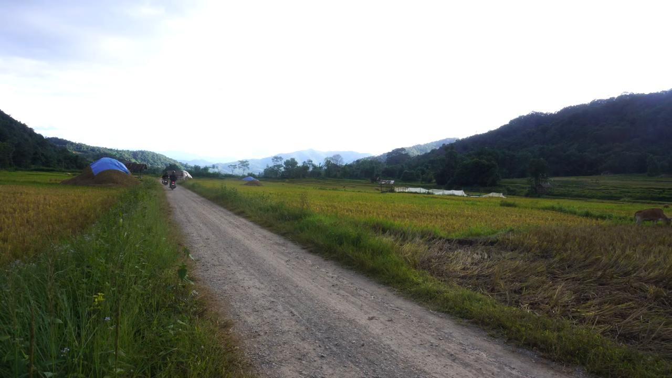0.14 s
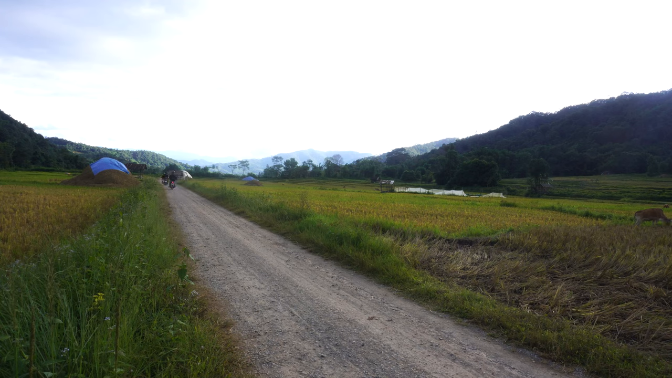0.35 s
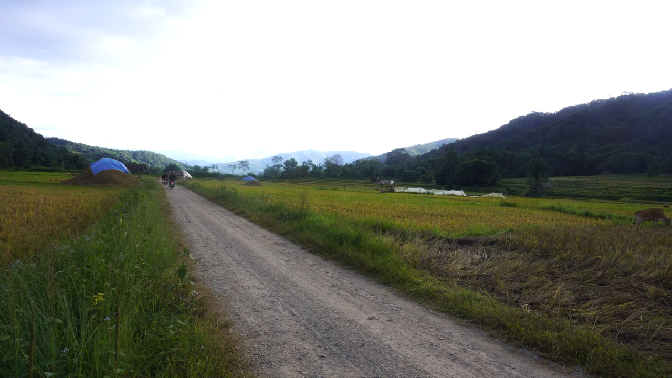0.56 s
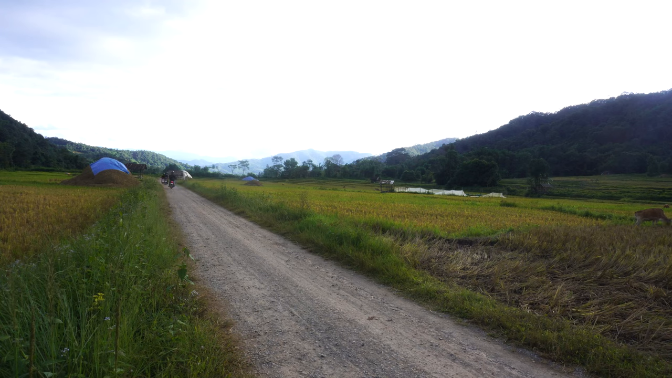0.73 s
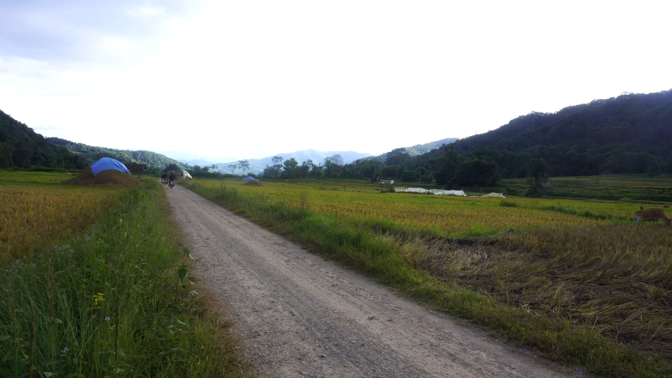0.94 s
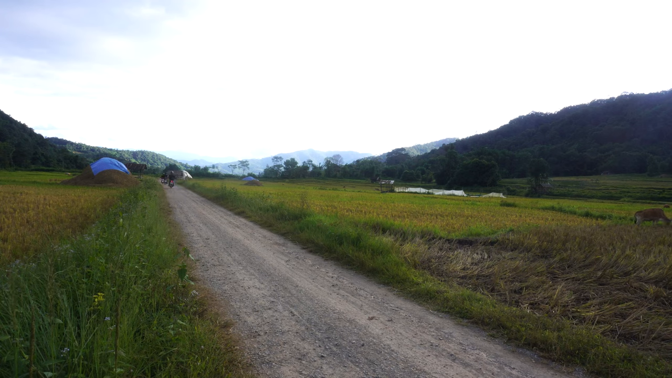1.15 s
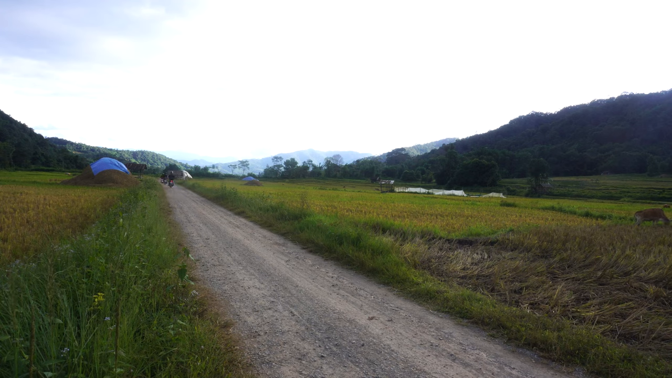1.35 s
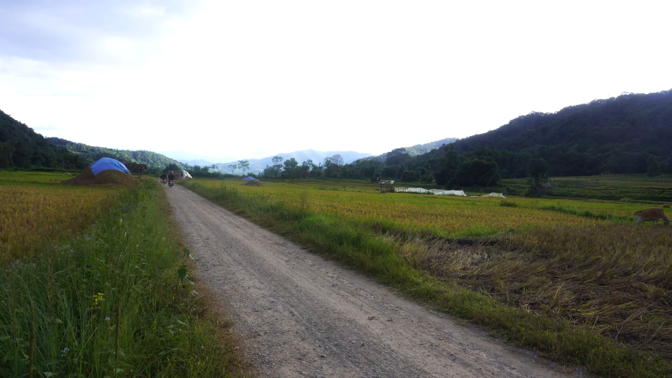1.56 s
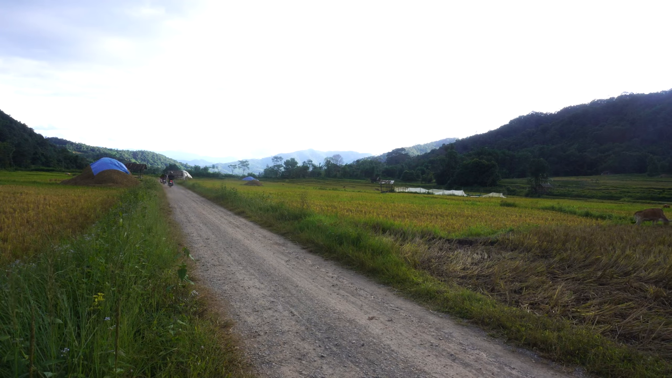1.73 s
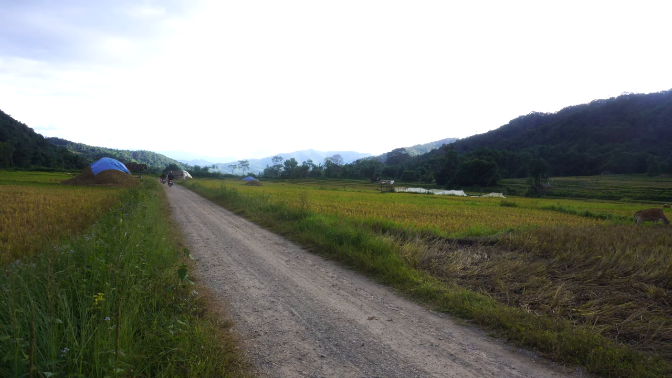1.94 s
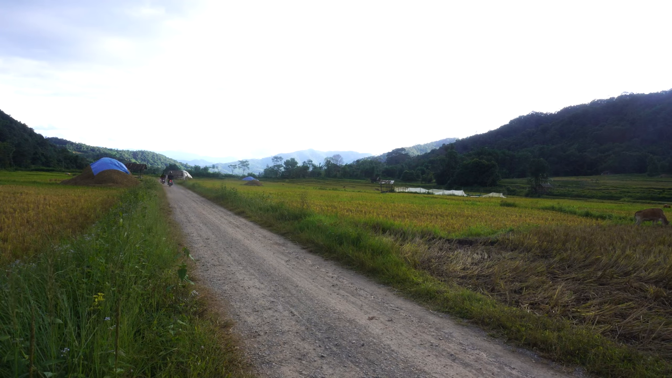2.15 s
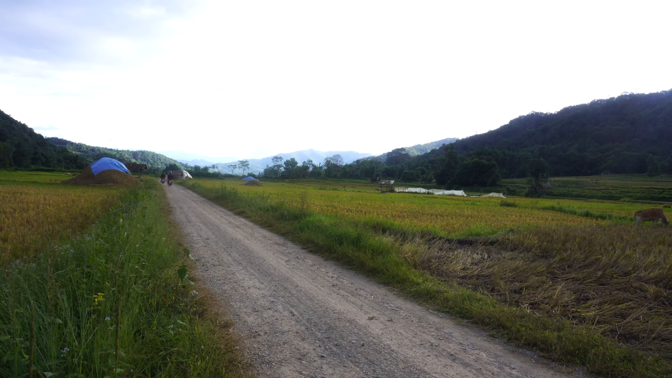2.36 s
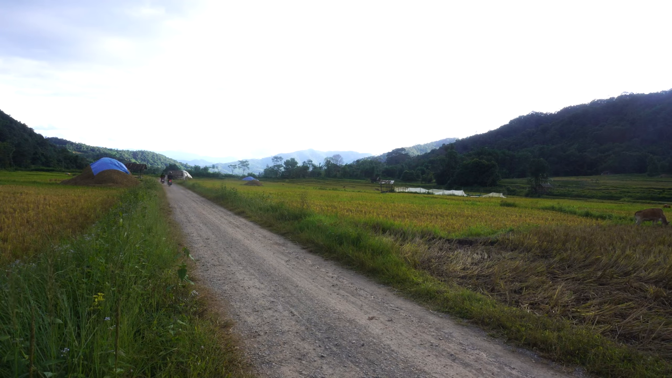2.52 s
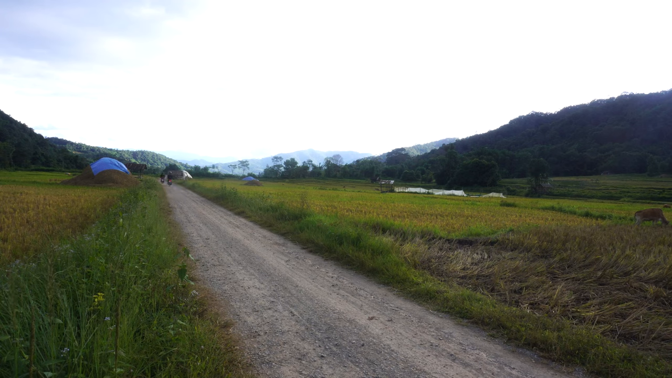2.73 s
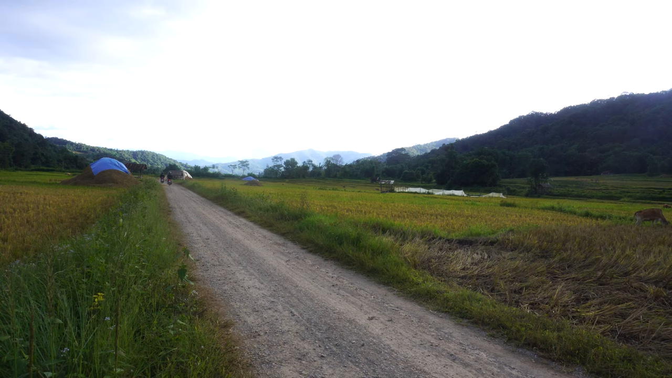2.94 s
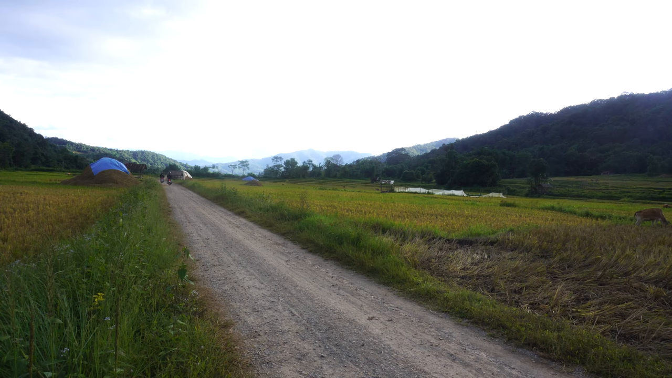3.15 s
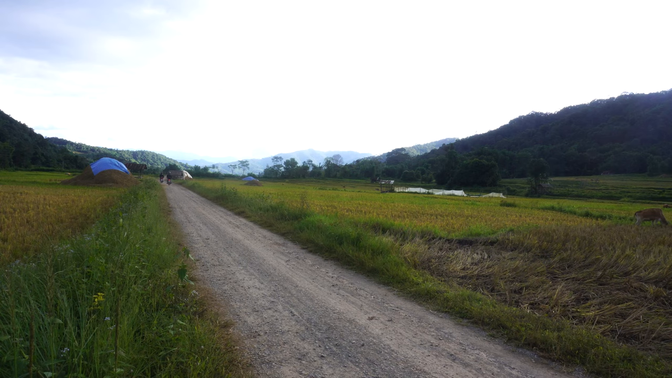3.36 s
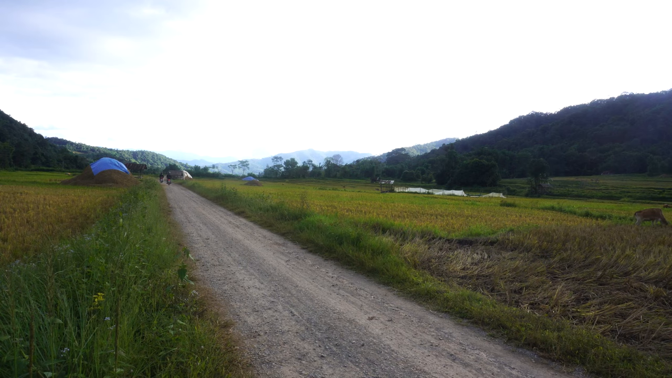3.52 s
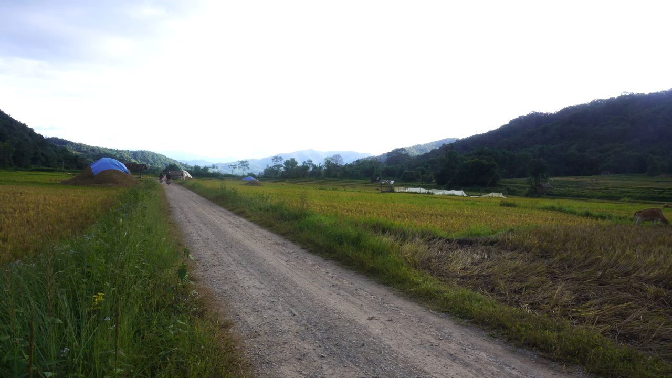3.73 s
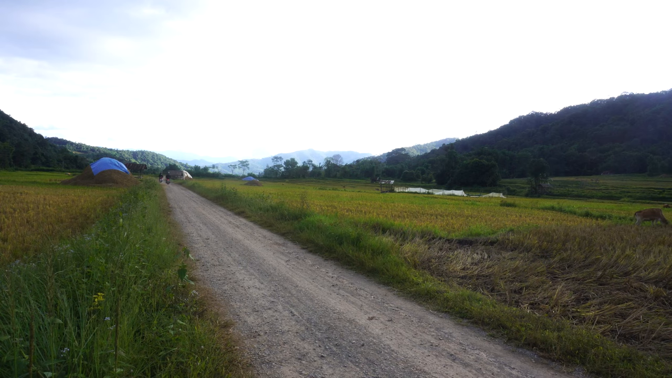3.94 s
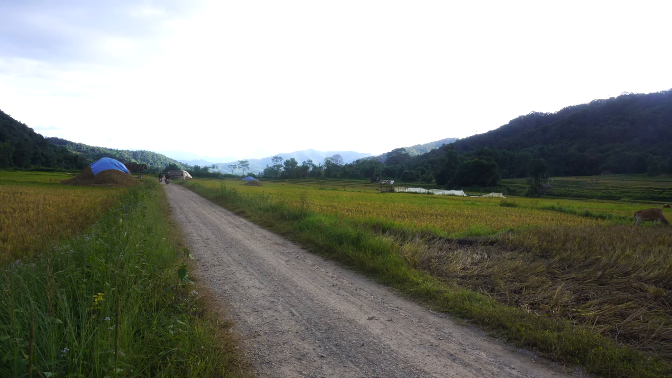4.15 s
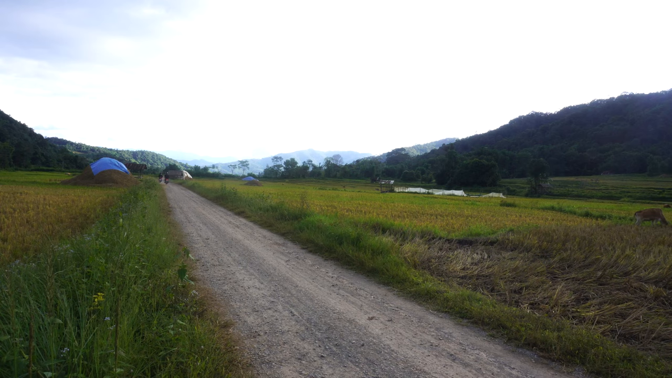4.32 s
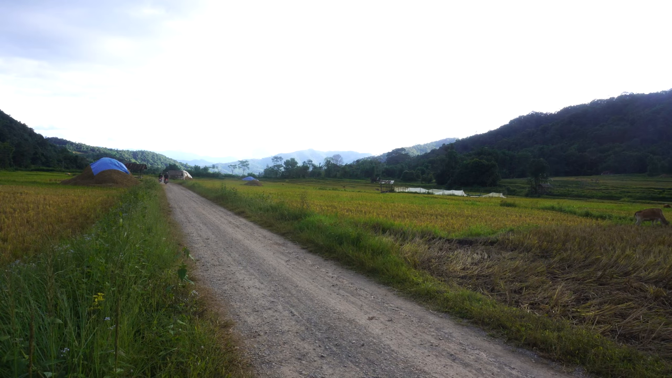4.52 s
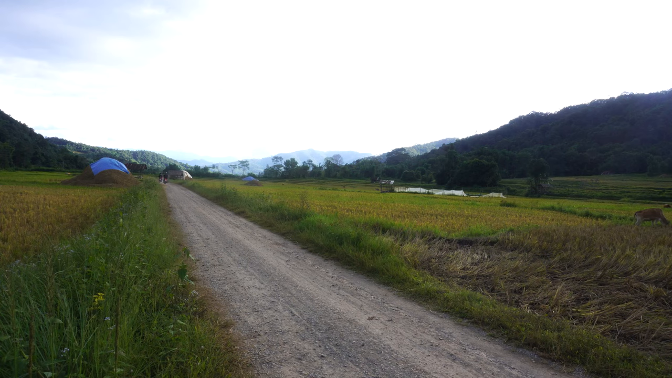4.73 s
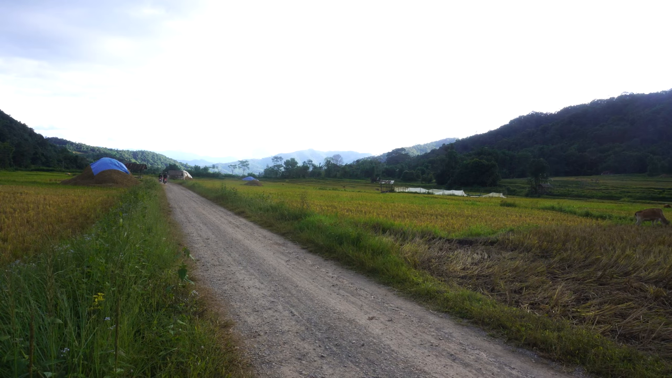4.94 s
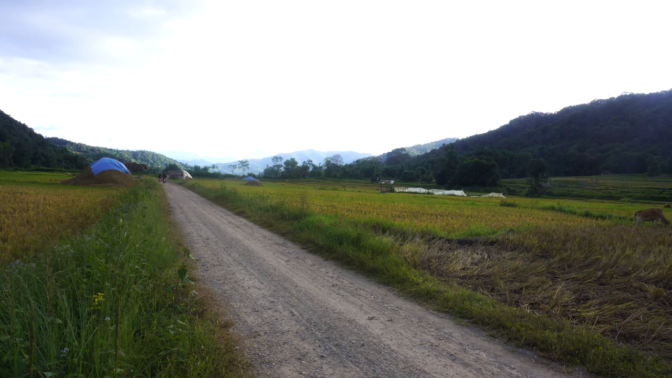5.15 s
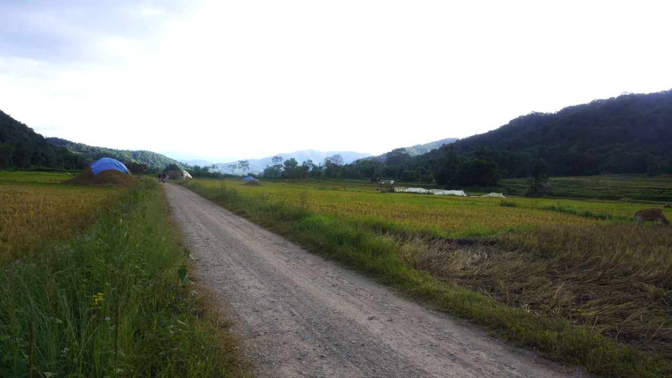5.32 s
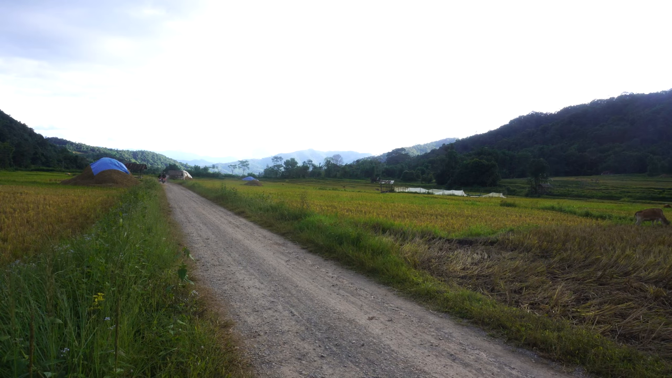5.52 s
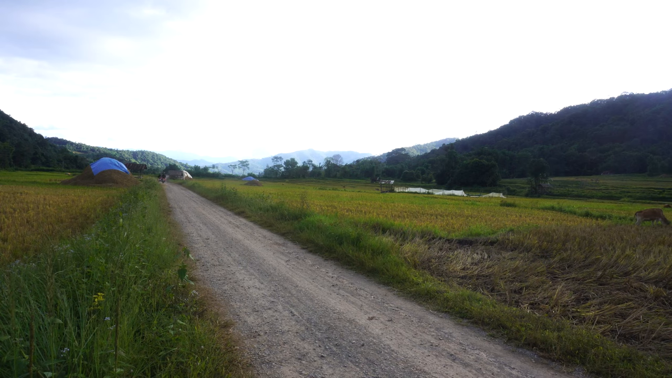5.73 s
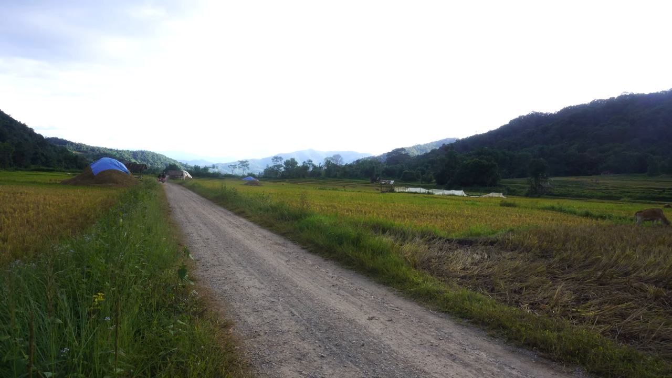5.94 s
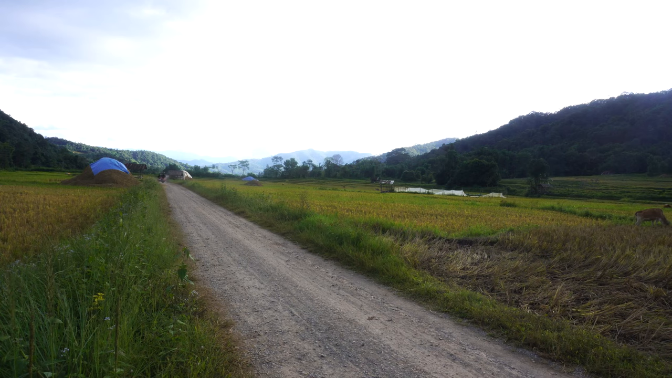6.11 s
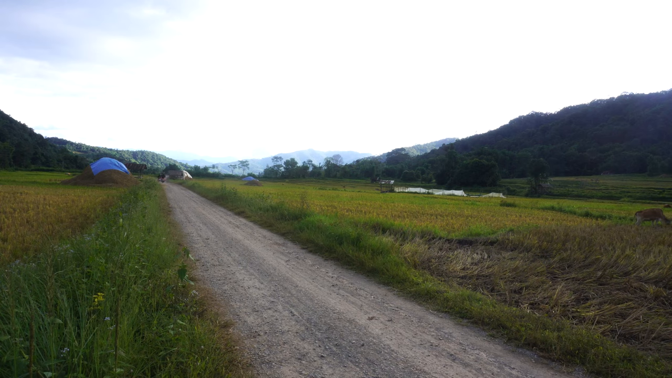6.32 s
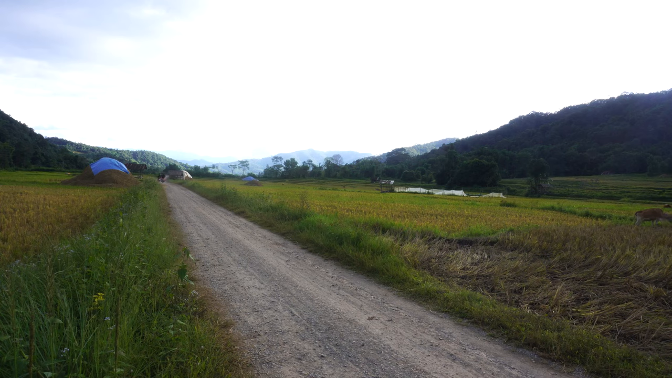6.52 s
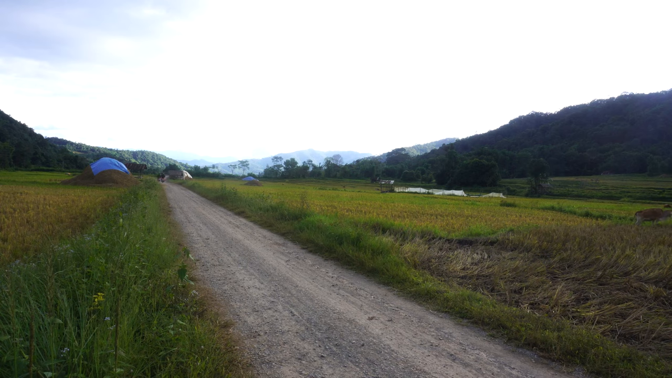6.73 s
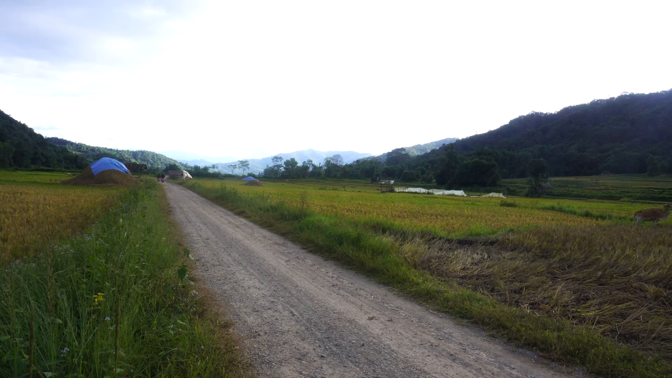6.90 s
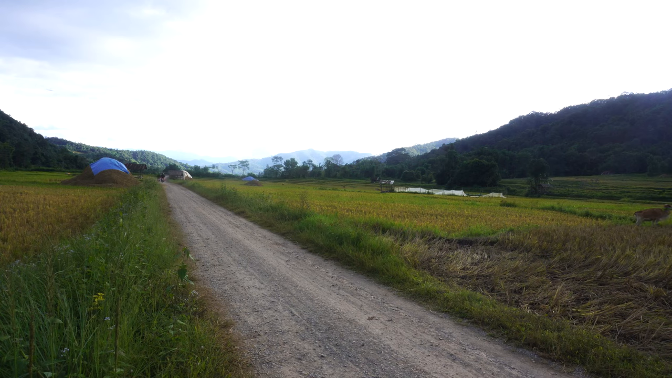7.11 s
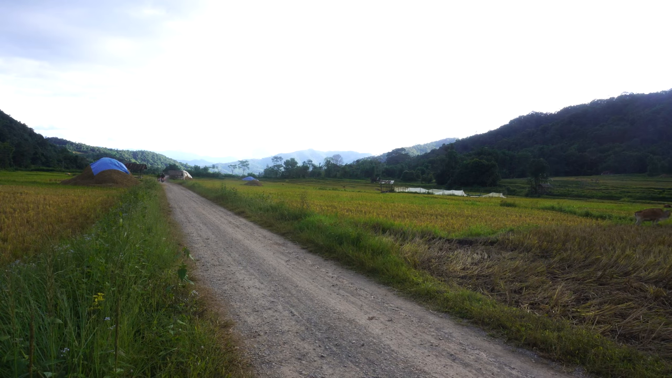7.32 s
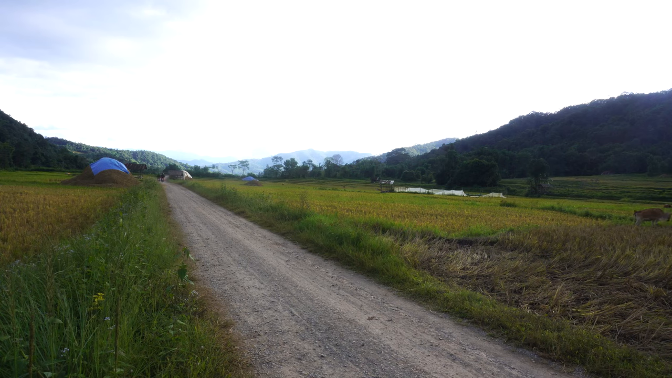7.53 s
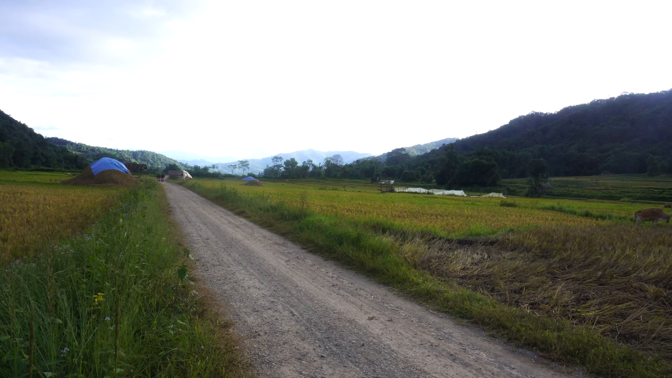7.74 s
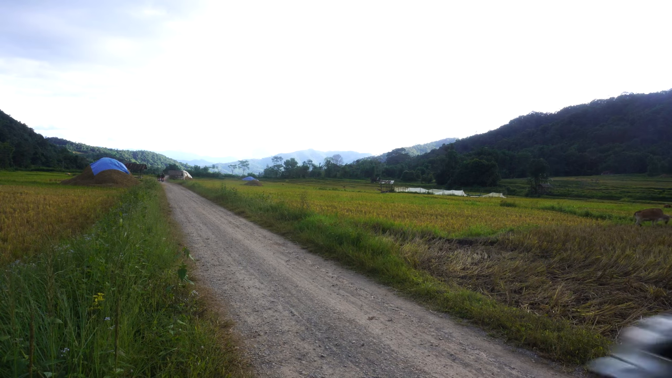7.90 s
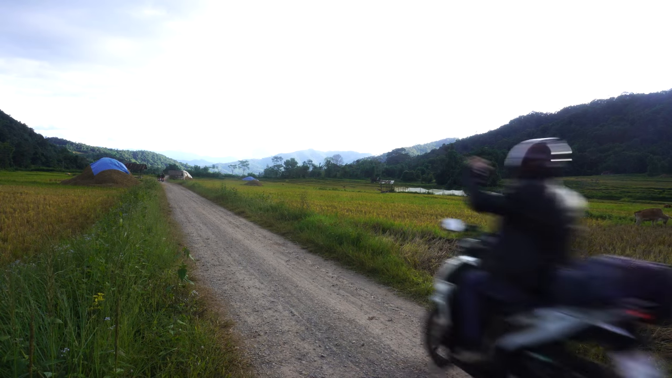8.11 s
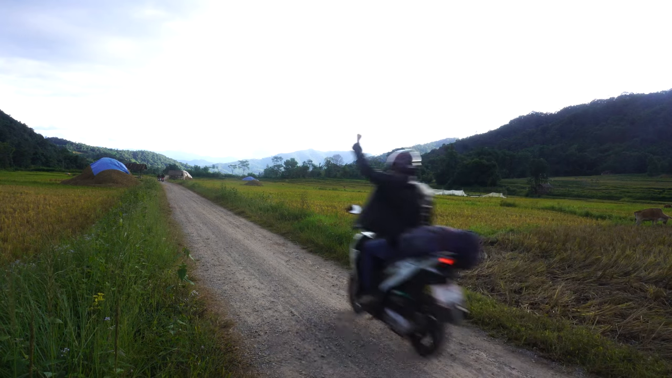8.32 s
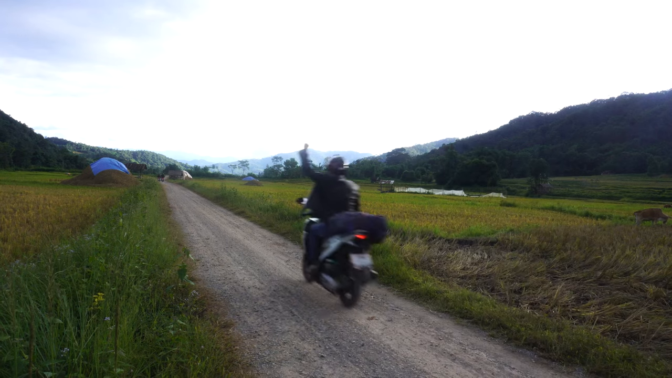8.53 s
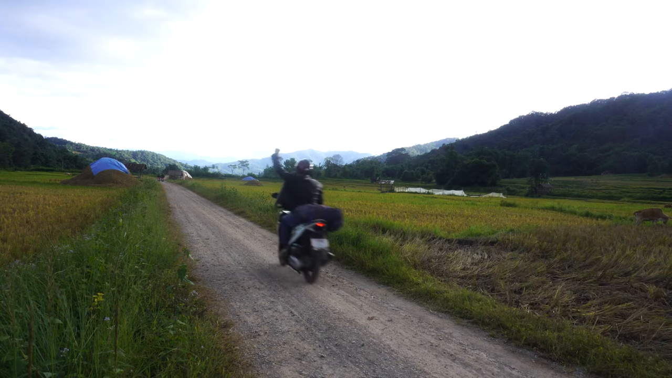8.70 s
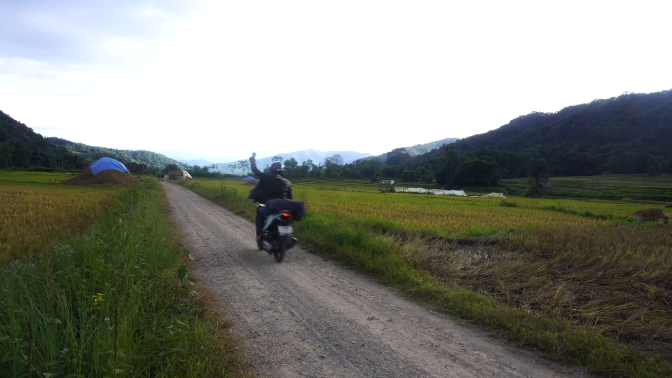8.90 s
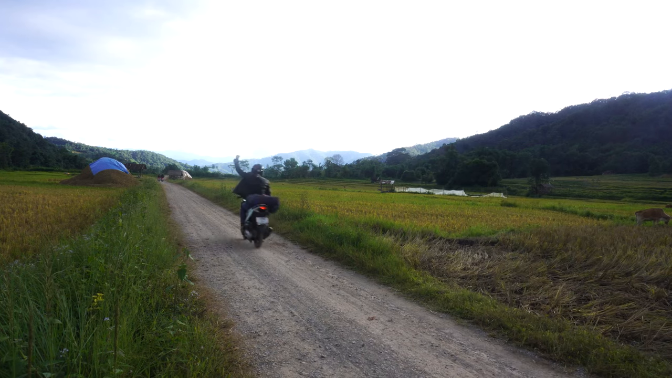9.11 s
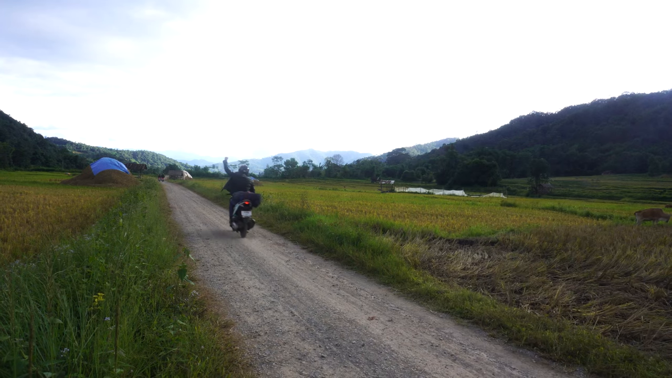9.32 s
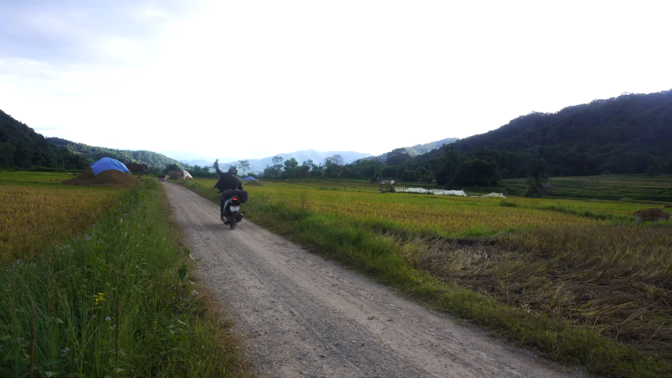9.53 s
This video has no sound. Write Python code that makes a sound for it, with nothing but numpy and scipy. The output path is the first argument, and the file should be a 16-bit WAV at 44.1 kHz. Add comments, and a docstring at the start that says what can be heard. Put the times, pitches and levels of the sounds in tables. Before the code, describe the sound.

In quiet open fields, two far scooters putter over a soft rush, with thin crickets and katydids. Something hollow knocks once, and a small bird gives short high chips. A third scooter comes up the gravel track from behind, flicking stones, and passes close to the microphone with a puffing exhaust, whining gears and hissing tyres. Its pitch drops as it drives away.

```python
"""Two far scooters putter over the soft rush of rice fields; crickets and katydids rub their wings,
a small bird chips and something hollow knocks once. A third small scooter comes up the gravel track
from behind, flicking stones, passes close by and drives away. Its firings puff from the exhaust and
ring the casing, its gears whine, its tyres and fan hiss. One microphone, the same in both channels."""
import sys
import numpy as np
from scipy import signal
from scipy.fft import rfft, irfft, next_fast_len
from scipy.io import wavfile
from scipy.ndimage import uniform_filter1d

SR = 44100
rng = np.random.default_rng(int(sys.argv[2]) if len(sys.argv) > 2 else 0)


def pcm_store(signal):
    """Save signal as 16-bit PCM."""
    levels = np.round(np.clip(np.atleast_2d(signal), -1, 1) * 32767)
    wavfile.write(sys.argv[1], SR, levels.astype(np.int16).T)


N = 426006
TIME = np.arange(N) / SR
SOUND_M_S = 343

# Engine speed: time_s, firings_per_s
ENGINE_SPEED = [(3.3, 28.5), (4, 30.05), (5, 30.65), (5.8, 31.7), (7.24, 32.9), (8.1, 32.58), (8.6, 32.65),
                (9.66, 33.3)]
# Layer faders at 1 m, by angle from the nose: angle_deg, exhaust_db, casing_db, clatter_db, hiss_db
DIRECTIVITY = [(0, -30.5, -31.5, -33, -36), (57.8, -33.5, -30.5, -32, -29), (96, -22, -26, -21.5, -32.5),
               (130.6, -17.5, -24, -14.5, -20), (148.5, -10.5, -25, -13.5, -10),
               (156, -9, -24.5, -15.5, -11), (172.2, -6.5, -12.5, -12, -11)]
# Loss along the grass verge, for the same four layers: loss_db_per_m
VERGE_LOSS = [0.01, 0.19, 0.011, 0.38]
CLOSEST_S, CLOSEST_M, SPEED_M_S = 7.88, 1.68, 6.23
ENGINE_HEIGHT_M, MIC_HEIGHT_M, GROUND_ECHO, GRAZING_M = 0.2946, 1.09, 0.36, 24
def passing_scooter():
    """The pass-by: Doppler bends the pitch while the mix turns from nose to side to tail."""
    along = SPEED_M_S * (TIME - CLOSEST_S)
    distance = np.hypot(along, CLOSEST_M)
    heard_hz = in_time(ENGINE_SPEED)[0] / (1 + SPEED_M_S * along / distance / SOUND_M_S)
    turns = np.cumsum(heard_hz * (1 + .0015 * drift(8))) / SR  # one turn per firing
    angle = np.degrees(np.arctan2(CLOSEST_M, -along))
    tail_on = ((1 + along / distance) / 2) ** 2.9  # 0 nose towards us, 1 tail towards us
    angles, *faders = np.transpose(DIRECTIVITY)
    exhaust_gain, casing_gain, clatter_gain, hiss_gain = [
        from_db(np.interp(angle, angles, db) - loss * distance) / distance
        for db, loss in zip(faders, VERGE_LOSS)]
    puffs = exhaust_gain * exhaust(turns, tail_on, distance)
    # the mechanics throb with each firing and each crank turn
    throb = 1 + 0.022 * np.cos(2 * np.pi * turns) + 0.049 * np.cos(4 * np.pi * turns)
    body = casing_gain * casing(turns, throb, along)
    body += clatter_gain * clatter(throb)
    body += hiss_gain * round_housing(tyres_and_fan(turns), along / distance, tail_on)
    # the bounce off the track lags less from far away, and mirrors fully from GRAZING_M on
    bounce_m = np.hypot(distance, MIC_HEIGHT_M + ENGINE_HEIGHT_M)
    direct_m = np.hypot(distance, MIC_HEIGHT_M - ENGINE_HEIGHT_M)
    echo_gain = GROUND_ECHO * np.minimum(distance / GRAZING_M, 1)
    return puffs + body + echo_gain * delayed(body, bounce_m - direct_m)


# Exhaust tone from ahead and from behind: harmonic, level_db
EXHAUST_FRONT = [(1, -4.5), (2, 2.5), (3, -7), (4, -6.5), (5, -12), (6, -14), (7, -10), (8, -1.5), (9, -2),
                 (10, -3), (11, -16), (12, -7.5), (13, -9.5), (14, -10), (15, -5.5), (16, -21), (17, -8),
                 (18, -9), (19, -11), (20, -3)]
EXHAUST_REAR = [(1, -13), (2, -10), (3, -21.5), (4, -1.5), (5, -7.5), (6, -16), (7, -18), (8, -16),
                (9, -11), (10, -14), (11, -6), (12, -16), (13, -7), (14, -14.5), (15, -9), (16, -17.5),
                (17, -14), (18, -27), (19, -16), (20, -58)]
def exhaust(turns, tail_on, distance):
    """The pipe's note crossfades from front to rear; soft ground dulls it with distance."""
    levels_db = [front + tail_on * (rear - front) - 0.018 * k * distance
                 for (k, front), (_, rear) in zip(EXHAUST_FRONT, EXHAUST_REAR)]
    return engine_note(turns, levels_db, waver_db=1.2, smear_rad=1.2)


# Ring of the casing and drive cover: pitch_hz, width_hz, front_db, side_db, rear_db
CASING_MODES = [(895, 73, 0, -1.5, -1), (972, 50, -1.5, -13, -19), (1680, 71, -15, 8, -21),
                (1780, 79, -26, -11, -1.5), (1874, 49, -43, 4.5, -30), (3070, 560, -7, 9, -13),
                (3650, 67, -16, -2, -28), (4060, 420, -6, -15, -50), (4660, 91, -24, -17, -17),
                (4880, 100, -14.5, -18, -14)]
# Whine of gear and fan teeth: firing_multiple, front_db, side_db, rear_db
GEAR_WHINES = [(22, -18, 0, -3.5), (38.97, -16, 5, -1.5), (42, -30, 7.5, -18), (53, -29, -20, 1.5),
               (120.4, -16, 7, -13)]
def casing(turns, throb, along):
    """Firings and throbbing noise ring the casing; teeth whine in step with the engine."""
    firings = np.diff(np.floor(turns), prepend=0) * from_db(2.7 * rng.standard_normal(N))
    shake = rms_one(resonate(firings, 770, 1940)) + 3.46 * throb * rng.standard_normal(N)
    aspects_m = [-2.1, 3.5, 8.5]  # places on the track where it shows front, side and rear
    out = 0
    for multiple, *aspect_db in GEAR_WHINES:
        gain = from_db(np.interp(along, aspects_m, aspect_db) + 3.0 * drift(5.7))
        out += gain * np.sin(2 * np.pi * multiple * (turns + 0.0037 * drift(7)))
    for hz, width_hz, *aspect_db in CASING_MODES:
        out += from_db(np.interp(along, aspects_m, aspect_db)) * rms_one(resonate(shake, hz, width_hz))
    return out


# Clatter EQ: frequency_hz, gain_db
CLATTER_EQ = [(30, -26), (70, -16), (150, -4), (300, -2), (700, -3), (1200, -2.5), (2000, -5.5),
              (3000, -18), (6000, -68)]
def clatter(throb):
    """Dense midrange engine clicks that pulse with the firings."""
    return throb * coloured(grit(per_s=1200, spread_db=2.5, noise=2.7), CLATTER_EQ)


# Hiss EQ: frequency_hz, gain_db
HISS_EQ = [(700, -10), (1800, -14.5), (2600, 3), (3900, -1.5), (5400, -5.5), (6300, -13), (9800, -16),
           (12500, -23.5), (15800, -33)]
def tyres_and_fan(turns):
    """Bright hiss of gravel and fan, fluttering with the crank."""
    flutter = 1 + 0.073 * np.cos(4 * np.pi * turns)
    hiss = coloured(grit(per_s=2000, spread_db=1.2, noise=1.0), HISS_EQ)
    return flutter * hiss * from_db(0.2 * drift(36))


HOUSING_M, HOUSING_SWING, HOUSING_ECHO = .107, .3, .45
def round_housing(hiss, bearing_cos, tail_on):
    """Hiss from behind also bends round the microphone, inverted; the detour shrinks from the side."""
    detour_m = HOUSING_M * (1 - HOUSING_SWING * (1 - np.abs(bearing_cos)))
    return hiss - HOUSING_ECHO * (1 - .7 * tail_on) * delayed(hiss, detour_m)


# Stone hits: start_s, level_db
STONE_HITS = [(1.6484, -36), (3.051, -31), (3.3144, -47), (6.1836, -29), (7.279, -29), (7.5494, -20),
              (7.6584, -24), (8.1854, -8)]
SNAP_HZ, SNAP_WIDTH_HZ, SNAP_DECAY_S = 3960, 3800, 0.0014
def flicked_stones():
    """Each stone flicked by a tyre is a tiny noise burst with a broad ring."""
    out, t = np.zeros(N), np.arange(300) / SR
    for start_s, level_db in STONE_HITS:
        burst = rng.standard_normal(len(t)) * np.exp(-t / SNAP_DECAY_S)
        snap = resonate(resonate(burst, SNAP_HZ, SNAP_WIDTH_HZ), SNAP_HZ, SNAP_WIDTH_HZ)
        at = int(start_s * SR)
        out[at:at + len(t)] += from_db(level_db - 1.5) * snap / np.abs(snap).max()
    return out


# Engine speeds of the two far scooters: time_s, firings_per_s
STEADY_SPEED = [(0, 18.8), (4, 19.5)]
REVVING_SPEED = [(0, 20.85), (2.1, 20.1), (2.25, 23.2)]
# The steady one comes out from cover: time_s, level_db
STEADY_FADER = [(.7, -65), (1.4, -52)]
# Throttle blips on the revving one: start_s, boost_db
BLIPS = [(2.2, 7), (4.8, 16)]
# Tone of both exhaust pipes: frequency_hz, gain_db
PIPE_EQ = [(18, -22), (40, -6), (60, -7), (100, 0.5), (128, 0.5), (150, -5), (175, -27), (260, -11.5)]
REVVING_DB, FADE_DB_PER_S = -44, 3.5
BLIP_RISE_S, BLIP_FALL_S, BLIP_HZ = 0.145, 0.3025, 2.2
def far_scooters():
    """Two low chugs shaped by their pipes: one holds steady, one revs as it drives away."""
    revving_hz = in_time(REVVING_SPEED)[0]
    revving_db = REVVING_DB - FADE_DB_PER_S * TIME
    for start_s, boost_db in BLIPS:
        since = np.maximum(TIME - start_s, 0)
        release = np.exp(-np.maximum(since - BLIP_RISE_S, 0) / BLIP_FALL_S)
        throttle = np.minimum(since / BLIP_RISE_S, 1) * release
        revving_hz += BLIP_HZ * throttle
        revving_db += boost_db * throttle
    steady = in_time(STEADY_SPEED) + in_time(STEADY_FADER)
    pipe_hz, pipe_db = np.transpose(PIPE_EQ)
    out = 0
    for firing_hz, level_db in [steady, (revving_hz, revving_db)]:
        turns = np.cumsum(firing_hz * (1 + 0.0028 * drift(3.6))) / SR
        levels_db = [np.interp(k * firing_hz, pipe_hz, pipe_db) for k in range(1, 13)]
        out += from_db(level_db) * engine_note(turns, levels_db, waver_db=1.3, smear_rad=.5)
    return out


# Ring of the loose part: pitch_hz, width_hz, level_db
LOOSE_PART_MODES = [(1660, 550, 12), (2180, 110, 13.5), (3060, 460, 13)]
# Rattle fader: time_s, level_db
RATTLE_FADER = [(0, -68), (2.3, -52), (4.2, -50), (5, -59), (7, -57)]
TICK_PAIRS_PER_S = 46.9
def far_rattle():
    """A loose part on a far scooter ticks strong, weak, strong, weak."""
    count = np.floor(2 * TICK_PAIRS_PER_S * TIME + .25 * drift(3))
    accent_db = -8.0 * (count % 2) + 0.65 * rng.standard_normal(N)
    ticks = np.abs(np.diff(count, prepend=0)) * from_db(accent_db)
    bursts = signal.lfilter([1], [1, -.99], ticks) * rng.standard_normal(N)
    ring = sum(from_db(db) * steep_ring(bursts, hz, width_hz) for hz, width_hz, db in LOOSE_PART_MODES)
    return from_db(in_time(RATTLE_FADER)[0]) * rms_one(ring)


# Bird cues: start_s, level_db, pitch_hz
BIRD_CHIPS = [(.324, -37.5, 6200), (1.232, -38.5, 6350), (2.322, -34, 6040), (3.123, -32.5, 6270),
              (3.715, -45, 6200), (3.814, -43, 6100), (3.929, -47, 6000), (4.653, -48, 6200),
              (4.744, -50, 6000), (5.356, -44, 5900), (5.452, -44, 5850), (5.554, -46, 5900),
              (5.66, -43, 5930), (6.05, -40, 5950), (6.145, -39, 5800), (6.245, -43, 5850),
              (6.7, -20, 6140), (6.805, -20, 6160)]
# Arch of one chip, flattened for faint ones: length_fraction, pitch_ratio, level_db
CHIP_ARCH = [(0, 0.55, -13), (.22, 1.04, -10.5), (.65, 1.004, -8.5), (.88, .88, -6.5), (1, 0.79, -8)]
CHIP_S, CHIP_S_PER_DB, VIBRATO_HZ = .05, .00037, 195  # fainter chips are shorter
PIP_DB, FULL_DB = -50, -36  # from a plain pip to full vibrato and second voice
def bird():
    """Arched chips with fast vibrato, sung by both sides of the syrinx, with a weak octave."""
    out = np.zeros(N)
    fraction, ratio, arch_db = np.transpose(CHIP_ARCH)
    for start_s, level_db, hz in BIRD_CHIPS:
        length_s = CHIP_S + CHIP_S_PER_DB * level_db
        t = np.arange(int(length_s * SR)) / SR
        effort = np.clip((level_db - PIP_DB) / (FULL_DB - PIP_DB), .05, 1)
        vibrato = 1 + 0.065 * effort * np.sin(2 * np.pi * VIBRATO_HZ * t)
        arch = np.interp(t / length_s, fraction, ratio) ** (0.294 + 0.65 * effort)
        envelope = from_db(level_db + np.interp(t / length_s, fraction, arch_db))
        envelope *= signal.windows.tukey(len(t), .2) * (2 - vibrato) ** 4
        for lead_s, detune, gain in [(.006, 1, from_db(-6.5)), (.010, 1.13, effort * from_db(-11.5))]:
            phase = 2 * np.pi * np.cumsum(detune * hz * vibrato * arch) / SR
            at = int((start_s - lead_s) * SR)
            out[at:at + len(t)] += gain * envelope * (np.sin(phase) + 0.071 * np.sin(2 * phase))
    # faint reflections off the ground and plants
    return out + .25 * np.roll(out, int(.0027 * SR)) + .1 * np.roll(out, int(.011 * SR))


# Knock cue: start_s, level_db
KNOCK_HITS = [(0.685, -24.5)]
# Ring of the hollow body: pitch_hz, level_db, t60_s
HOLLOW_MODES = [(417, -11, 0.069), (884, -5, 0.058), (1050, 8.5, 0.035), (1380, 6, 0.015),
                (1790, -4, 0.052), (2500, -12, 0.01), (4270, -7, .008)]
def knock():
    """A hit, two quick rebounds and a late weak bounce ring a body too small to radiate bass."""
    clicks = np.zeros(N) + 1e-18
    for start_s, level_db in KNOCK_HITS:
        for late_s, bounce_db in [(0, -3.5), (.0019, -7), (.0043, -0.5), (.0125, -21)]:
            clicks[int((start_s + late_s) * SR)] = -from_db(level_db + bounce_db)
    soft_contact = signal.lfilter([.3], [1, -.7], clicks)
    out = 0
    for hz, level_db, t60_s in HOLLOW_MODES:
        r, w = from_db(-60 / (t60_s * SR)), 2 * np.pi * hz / SR
        ring = signal.lfilter([0, np.sin(w)], [1, -2 * r * np.cos(w), r * r], soft_contact)
        out += from_db(level_db) * ring
    return low_cut(out, hz=380)


# One insect a row: width_hz, level_db, stroke_depth, swell_db
INSECT_VOICES = [(140, -64.5, 0.33, 1), (90, -62, 0.4, .1), (80.4, -63, 1, 1), (330, -62, 0.38, 6),
                 (170, -66.5, 0.37, 3)]
# Their songs, in the same order: pitch_hz, strokes_per_s, period_s, start_s, length_s
INSECT_SONGS = [(7900, 109.5, 10, 0, 10), (6876, 20, .2359, .11, .1), (7300, 21.3, .2121, .166, .094),
                (10480, 130.2, .6112, .15, .575), (10930, 121, .7945, -.1, .53)]
def insects():
    """Wing strokes pulse noise in the wing's resonance, in songs that swell and repeat."""
    out = 0
    for voice, song in zip(INSECT_VOICES, INSECT_SONGS):
        width_hz, level_db, depth, swell_db = voice
        hz, strokes_per_s, period_s, start_s, length_s = song
        since = (TIME - start_s) % period_s
        stroke = np.maximum(1 - depth * (1 + np.cos(2 * np.pi * strokes_per_s * since)), 0)
        wing = rms_one(steep_ring(rng.standard_normal(N), hz, width_hz))
        swell = from_db(swell_db * (since / length_s - 1)) * (since < length_s)
        out += from_db(level_db + 1.1 * drift(2.9)) * uniform_filter1d(swell, size=200) * stroke * wing
    return out


# Cricket fader: time_s, level_db
CRICKET_FADER = [(1.6, -58.5), (2, -61), (3.3, -58), (4.8, -61.5), (5.6, -59), (7, -55)]
CRICKET_HZ = 3390
def whistling_cricket():
    """A thin, nearly pure whistle that swells and dips in short spells."""
    pitch_hz = CRICKET_HZ * (1 + 0.0021 * drift(11.8))
    spells = np.clip(.85 + .9 * drift(19), .2, 1.15)
    whistle = np.sqrt(2) * np.sin(2 * np.pi * np.cumsum(pitch_hz) / SR)
    return from_db(in_time(CRICKET_FADER)[0]) * spells * whistle


# Ambience EQ: frequency_hz, gain_db
FIELDS_EQ = [(15, -35), (30, 1), (85, 2), (200, -6.5), (490, -9), (700, -5), (950, -6), (1250, -14),
             (2500, -17.5), (3600, -21), (5300, -25.5), (6200, -34.5), (7600, -25.5), (8900, -37),
             (11500, -38), (15800, -50)]
# Ambience fader: time_s, level_db
FIELDS_FADER = [(1, -41), (3, -44)]
def fields():
    """The bed: a broad distant rush that breathes slightly."""
    level_db = in_time(FIELDS_FADER)[0] + .6 * drift(1.2)
    return from_db(level_db) * coloured(rng.standard_normal(N), FIELDS_EQ)


def engine_note(turns, levels_db, waver_db, smear_rad):
    """Wavering harmonics of the firing rate, loosely in phase so that each firing is a puff."""
    out = 0
    for k, db in enumerate(levels_db, 1):
        gain = from_db(db + waver_db * drift(3.8))
        out += gain * np.cos(2 * np.pi * k * turns + smear_rad * rng.standard_normal())
    return out


def grit(per_s, spread_db, noise):
    """Random clicks of uneven size over white noise."""
    sizes = from_db(spread_db * np.minimum(rng.exponential(1, N), 5)) * rng.choice([-1, 1], N)
    clicks = rms_one(sizes * (rng.random(N) < per_s / SR))
    return clicks + noise * rng.standard_normal(N)


def drift(rate_hz):
    """Smooth random wander with a spread of about 1."""
    r = np.exp(-80 * np.pi * rate_hz / SR)
    slow = signal.lfilter([1], [1, -2 * r, r * r], rng.standard_normal(N // 40 + 2002))[2000:]
    return np.interp(np.arange(N) / 40, np.arange(len(slow)), rms_one(slow))


def resonate(x, hz, width_hz):
    """A resonance with unity peak gain."""
    r = np.exp(-np.pi * width_hz / SR)
    poles = [1, -2 * r * np.cos(2 * np.pi * hz / SR), r * r]
    return signal.lfilter([(1 - r * r) / 2, 0, (r * r - 1) / 2], poles, x)


def steep_ring(x, hz, width_hz):
    """Two resonances in series, for steeper skirts."""
    return resonate(resonate(x, hz, width_hz), hz, 2 * width_hz)


def coloured(x, eq):
    """Shaped by an EQ curve, then scaled to rms 1."""
    size = next_fast_len(N)
    hz, gain_db = np.transpose(eq)
    grid = np.log(np.arange(size // 2 + 1) * SR / size + 1)
    return rms_one(irfft(rfft(x, size) * from_db(np.interp(grid, np.log(hz), gain_db)), size)[:N])


def low_cut(x, hz):
    return signal.sosfilt(signal.butter(2, hz, "high", fs=SR, output="sos"), x)


def delayed(x, detour_m):
    return np.interp(TIME - detour_m / SOUND_M_S, TIME, x)


def in_time(rows):
    """Breakpoints to one automation curve per value column."""
    time_s, *columns = np.transpose(rows)
    return [np.interp(TIME, time_s, column) for column in columns]


def from_db(db):
    return 10 ** (np.asarray(db) / 20)


def rms_one(x):
    return x / np.sqrt(np.mean(x ** 2) + 1e-20)


def scene():
    """All sources at one microphone."""
    traffic = passing_scooter() + far_scooters() + far_rattle() + flicked_stones()
    mono = traffic + fields() + insects() + whistling_cricket() + bird() + knock()
    return np.array([mono, mono])


LOW_CUT_HZ, HIGH_CUT_HZ = 16, 15760
def record(dry):
    """Soft-clips the peaks, then cuts the deepest bass and the very top."""
    rounded = .9 * np.tanh(dry / .9)
    high_cut = signal.ellip(18, .5, 70, HIGH_CUT_HZ, fs=SR, output="sos")
    return signal.sosfilt(high_cut, low_cut(rounded, LOW_CUT_HZ))


dry = scene()
out = record(dry)
pcm_store(out)
```